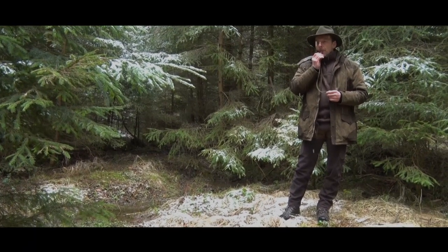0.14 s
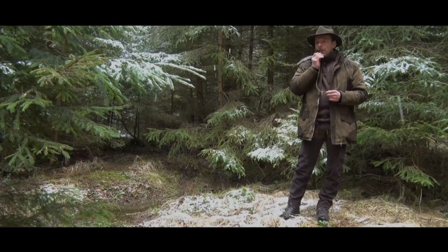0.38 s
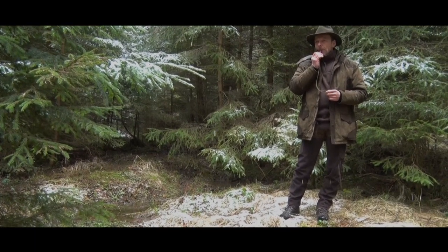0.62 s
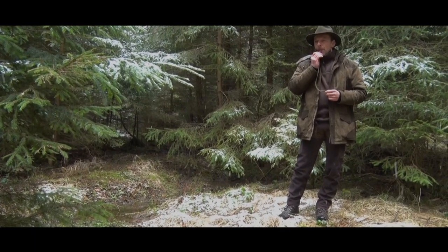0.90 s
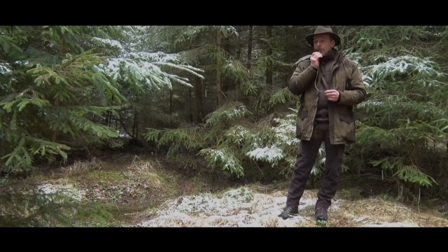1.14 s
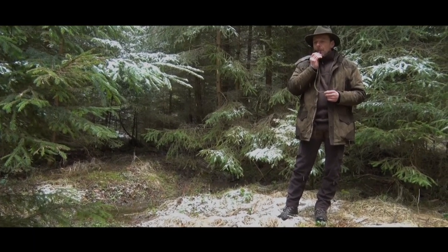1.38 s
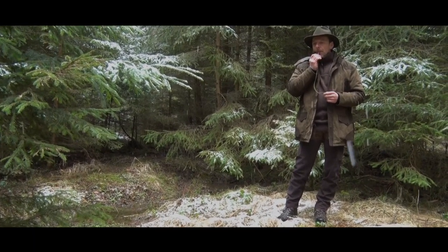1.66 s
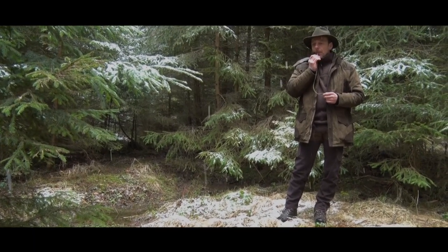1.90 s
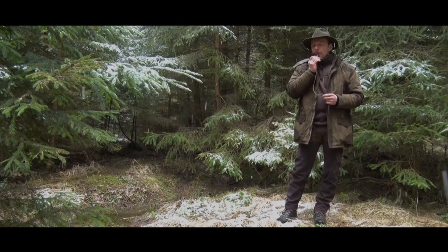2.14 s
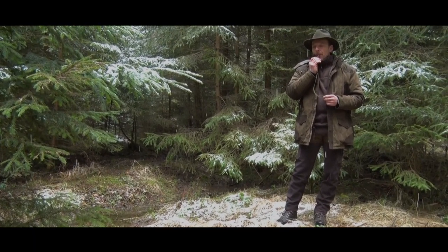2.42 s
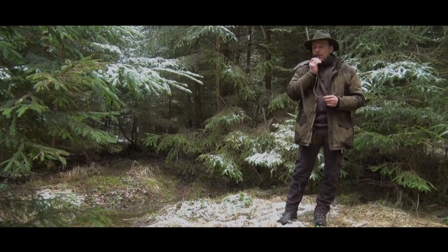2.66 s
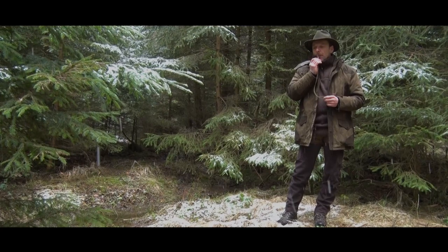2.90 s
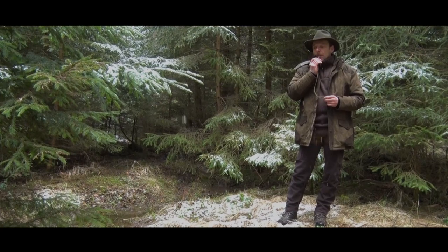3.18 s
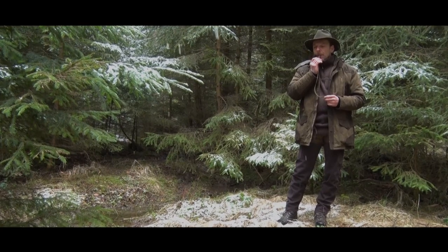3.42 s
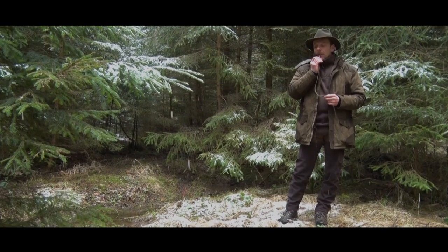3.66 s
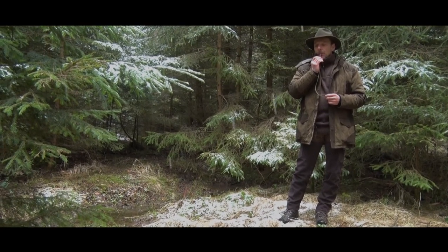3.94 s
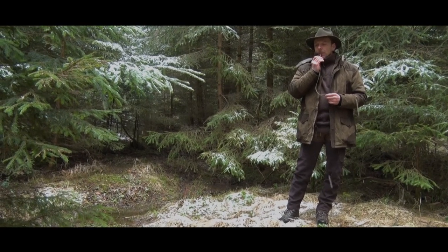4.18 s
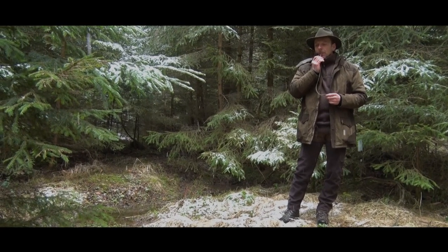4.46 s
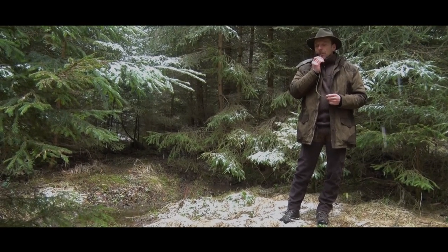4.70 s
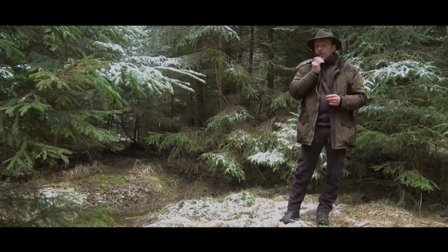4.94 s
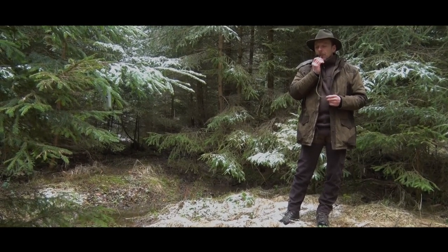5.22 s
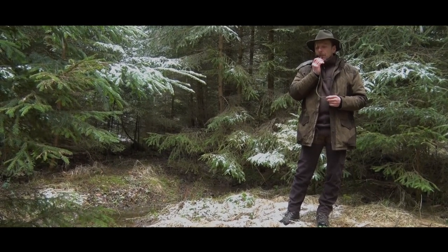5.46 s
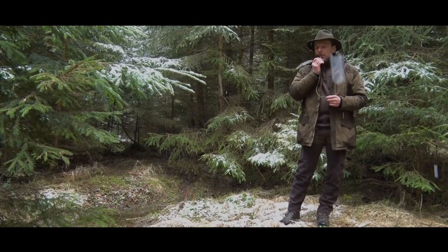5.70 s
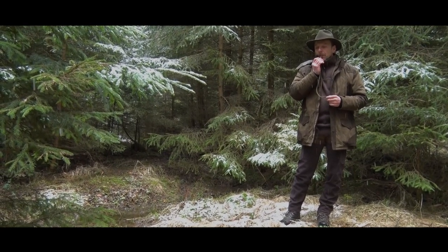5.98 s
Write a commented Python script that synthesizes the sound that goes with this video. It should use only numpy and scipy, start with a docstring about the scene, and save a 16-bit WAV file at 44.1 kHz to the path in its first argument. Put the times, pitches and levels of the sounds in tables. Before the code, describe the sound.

Irregular bursts of tiny, very high, breathy squeaks from a small blown whistle call, mouse-like, in a quiet snowy forest with faint drips.

```python
"""A small antler whistle, blown in short puffs a few metres from the microphone in a quiet snowy forest.
The air jet through its holes sings one clean line that jumps between three jet stages as the pressure
changes: near-sines with octave partners. Filtered noise makes the hiss of the jet, sparse echoes the
faint tail from the trunks, short cracks and rings the wet snow and drips. A faint tone sets in late, and
shaped noise gives the distant rumble, the air and the microphone's own hiss."""
import sys
import numpy as np
from scipy import signal
from scipy.fft import rfft, irfft
from scipy.io import wavfile
from scipy.ndimage import uniform_filter1d

SR = 44100
rng = np.random.default_rng(int(sys.argv[2]) if len(sys.argv) > 2 else 0)


def elevation(decibels):
    """Turn decibel levels (scalar or array-like) into linear amplitude ratios."""
    levels = np.asarray(decibels, float)
    return 10 ** (levels / 20)


def dump_mix(stems):
    """Bounce the given channels to the path in sys.argv[1] as a 16-bit WAV at rate SR."""
    frames = np.atleast_2d(stems).T  # one column per channel
    limited = np.clip(frames, -1, 1)  # hard clip at full scale
    pcm = np.round(limited * 32767).astype(np.int16)
    wavfile.write(sys.argv[1], SR, pcm)


N = 268569
TOP_HZ = 15900  # upper band limit


def evened(x):
    """Scales to rms 1."""
    return x / np.sqrt(np.mean(x ** 2) + 1e-20)


def read(points, hz):
    """Reads a spectrum table on a log frequency axis."""
    f, value = np.transpose(points)
    return np.interp(np.log(hz + 1), np.log(f + 1), value)


def add(mix, s, sound):
    """Mixes a sound in at s seconds."""
    part = mix[..., round(s * SR):][..., :sound.shape[-1]]
    part += sound[..., :part.shape[-1]]


def slow(count, hz):
    """Random drift of rms 1 up to hz."""
    return evened(signal.lfilter(*signal.butter(2, hz, fs=SR), rng.standard_normal(count)))


def resonate(x, hz, width_hz):
    """A fixed resonance of gain 1."""
    return signal.lfilter(*signal.iirpeak(hz, hz / width_hz, SR), x)


def faded(t, rise, fall):
    """Soft start and end, in seconds, over the times t."""
    nearest_end = np.minimum((t - t[0]) / rise, (t[-1] - t) / fall)
    return np.sin(np.pi / 2 * np.clip(nearest_end, 0, 1)) ** 2


def rounded(curve, size):
    """Rounds the corners of a curve over size samples and keeps its ends."""
    padded = np.pad(curve, size, "reflect", reflect_type="odd")
    return uniform_filter1d(padded, size)[size:-size]


def forest():
    """Distant rumble and air, with the microphone's own hiss on top: stereo noise, faintly patchy."""
    # background spectrum before levelling: (frequency [Hz], relative density [dB per Hz])
    floor = [(12, -46.5), (20, -6), (81, -2.5), (210, -14.5), (270, -15), (377, -14), (923, -22),
             (1030, -23.5), (4060, -32), (4540, -31), (13900, -42), (16000, -48)]
    # likeness of the left and right noise: (frequency [Hz], correlation [-1 to 1])
    likeness = [(60, 0.99), (240, 1), (950, 0.45), (3770, 0.091), (15000, 0.99)]
    floor_db = -64.5  # rms of the whole background
    frames, hz = N // 256 + 5, np.fft.rfftfreq(1024, 1 / SR)
    a, b, c, d, patches = rng.standard_normal((frames, 513, 5)).T
    patches = evened(uniform_filter1d(uniform_filter1d(patches, 14, 0), 12, 1))
    same = np.clip(read(likeness, hz), -1, 1)[:, None]
    left = a + 1j * b
    right = same * left + np.sqrt(1 - same ** 2) * (c + 1j * d)
    patch_db = 1.8 * np.clip(hz / 900, 0, 1)[:, None] * patches  # the lowest rumble stays even
    z = np.array([left, right]) * elevation(read(floor, hz)[:, None] + patch_db)
    noise = signal.istft(z, nperseg=1024, noverlap=768)[1][:, :N]
    return elevation(floor_db) * evened(noise)


def hum():
    """A soft sine that sets in and then wavers a little in level."""
    # faint tone: (onset [s], level before a 4 dB lift [dB], frequency [Hz])
    tone = [(5.77, -73, 441)]
    (s, db, hz), = tone
    t = np.arange(N) / SR
    level = elevation(db + 4.0 + 2.0 * slow(N, 10))
    return level * np.clip((t - s) / 0.019, 0, 1) * np.sin(2 * np.pi * hz * t)


def ticks():
    """Snow and drips landing nearby: each a short noise crack and a decaying ring; faint ones at random."""
    # landings: (time [s], ring level before panning [dB], ring frequency [Hz], fall by 60 dB [s])
    landings = [(0.189, -53, 980, 0.038), (0.406, -56, 2700, 0.038), (1.973, -61, 2420, 0.015),
                (2.011, -51, 3350, .015), (2.089, -56, 1290, .025), (2.969, -53.5, 874, 0.027),
                (3.286, -38.5, 1454, 0.064), (3.324, -40.5, 1225, 0.011), (3.404, -46, 640, 0.032),
                (3.439, -51, 3530, .015), (3.459, -43.5, 866, 0.0098), (3.751, -47, 800, 0.017),
                (3.833, -61.5, 1350, 0.12), (3.922, -58, 763, 0.063), (3.952, -55.5, 723, 0.063),
                (4.027, -62.5, 1880, 0.024), (4.145, -57.5, 1350, 0.024), (4.238, -56.5, 3680, 0.014),
                (5.644, -49.5, 1878, 0.0076)]
    # a clump of snow on something hollow: (time [s], peak level [dB], frequency [Hz], fall by 60 dB [s])
    thump = [(3.326, -42, 102, .22)]
    out, t = np.zeros((2, N)), np.arange(SR // 4) / SR
    # 40 faint landings, same columns
    faint = rng.random((40, 4)) * [N / SR, 8, 2500, .015] + [0, -70, 700, .015]
    for s, db, hz, t60 in list(landings) + list(faint):
        pan_db = 2.3 + 2.9 * rng.standard_normal()  # mostly left of centre
        dull_noise = signal.lfilter(*signal.butter(3, 3600, fs=SR), rng.standard_normal(len(t)))
        crack = dull_noise * elevation(-60 * t / .025)
        ring = np.sin(2 * np.pi * hz * t) * elevation(-60 * t / t60)
        sides = elevation(db + np.array([[pan_db], [-pan_db]]) / 2)
        add(out, s, sides * (ring + 1.65 * crack))
    for s, db, hz, t60 in thump:
        add(out, s, elevation(db - 60 * t / t60) * np.sin(2 * np.pi * hz * t))
    return out


def trees(x, t60=0.28, gap=0.0016):
    """Sparse echoes from trunks after gap seconds, one in every 20 samples, other for each side."""
    at = np.arange(round(gap * SR), SR // 2, 20)
    taps = np.zeros((2, SR // 2 + 20))
    spots = at + rng.integers(0, 20, (2, len(at)))
    echoes = rng.choice([-1., 1.], spots.shape) * elevation(-60 * at / SR / t60)
    np.put_along_axis(taps, spots, echoes, 1)
    return signal.fftconvolve(x[None], taps / np.linalg.norm(taps[0]), axes=1)[:, :N]


def jet_hiss(lines, calm):
    """Turbulence through the chamber modes; the overblown mode roars while no line holds the jet."""
    # pushes of air: (start [s], length [s], relative peak level [dB], place of the peak [0-1])
    pushes = [(0.113, 0.1, -37.5, 0.62), (0.352, 0.043, -47, 0.03), (0.503, 0.044, -48.5, 0.66),
              (.743, 0.012, -45.5, 0.5), (1.053, 0.13, -50, 0.44), (1.149, 0.098, -45, 0.6),
              (1.325, .11, -40, 0.38), (1.443, 0.12, -42.5, 0.49), (1.619, 0.077, -41, 0.5),
              (1.671, 0.084, -43, .5), (1.733, 0.13, -42, 0.38), (2.102, 0.072, -47, 0.95),
              (2.288, .035, -54, 0.4), (2.348, 0.017, -45, 0.4), (2.421, 0.045, -53, 0),
              (2.507, 0.017, -47, 0.35), (2.592, 0.013, -48, 0.45), (2.911, 0.073, -50, .6),
              (3.27, 0.077, -41, 1), (3.366, 0.13, -40.5, 0.56), (3.52, 0.057, -57, 0.1),
              (3.595, 0.091, -45.5, 0.4), (4.203, 0.05, -53.5, .2), (4.283, 0.025, -47, 0.16),
              (4.36, 0.021, -51, 0), (4.671, 0.06, -52, 0.4), (4.873, 0.14, -45, 0.31),
              (5.161, 0.092, -50.5, 0.84), (5.457, 0.14, -41, 0.55), (5.605, 0.16, -46.5, 0.46),
              (5.981, 0.13, -38.5, 0.34)]
    # broad hiss: (frequency [Hz], gain [dB])
    hiss = [(500, -17), (2500, -12.5), (4300, -11.5), (7600, -3), (10500, -5), (12300, -4.5),
            (13500, -14.5)]
    # chamber modes, each resonance passed twice: (frequency [Hz], width of one pass [Hz], mean gain [dB])
    chamber = [(4910, 130, -5), (6100, 1800, -4), (8400, 1600, -3), (11010, 3100, -8.5)]
    # noisy mode heard when no line locks: (frequency [Hz], width of one pass [Hz], mean gain [dB])
    overblown_mode = (9500, 1000, 10)
    start_db, end_db = -10, -10.5  # ends of a push against its peak
    blow = np.zeros(N)
    for start, length, db, place in pushes:
        s = start + length * np.array([0, np.clip(place, .01, .99), 1])
        level_db = db + np.array([start_db * min(2 * place, 1), 0, end_db])
        t = np.arange(s[0] - .004, s[-1] + .012, 1 / SR)
        add(blow, t[0], elevation(np.interp(t, s, level_db)) * faded(t, .004, .012))
    noise = rng.standard_normal(N) * elevation(1.96 * slow(N, 130))  # eddies make the hiss rasp
    wide = irfft(rfft(noise) * elevation(read(hiss, np.fft.rfftfreq(N, 1 / SR))), N)
    modes = np.zeros(N)
    for hz, width_hz, db in chamber:
        modes += elevation(db + 4.1 * slow(N, 50)) * resonate(resonate(noise, hz, width_hz), hz, width_hz)
    # bright hiss around 15 kHz, heard where the push outweighs the lines of the lower two stages
    outweighs = blow ** 2 / (blow ** 2 + elevation(-11) * uniform_filter1d(calm ** 2, 600) + 1e-12)
    bright = outweighs * blow * elevation(36) * resonate(noise, 15000, 3000)
    hz, width_hz, db = overblown_mode
    # near 1 where the push outweighs every line
    free = blow ** 2 / (blow ** 2 + elevation(-6.5) * uniform_filter1d(lines ** 2, 200) + 1e-12)
    roar = free * elevation(db + 1.2 * slow(N, 70)) * resonate(resonate(noise, hz, width_hz), hz, width_hz)
    return elevation(-1.0) * blow * (wide + modes + roar + bright)


def arch(place, rise_bend, fall_bend, count=13):
    """Places 0-1 along an event and heights: 1 at the top, 0 at the ends; a top near an end is that end."""
    x = np.linspace(0, 1, count)
    place = place if .15 < place < .7 else round(place)
    rise = (abs(place - x) / (place + 1e-9)) ** rise_bend
    fall = (abs(x - place) / (1 - place + 1e-9)) ** fall_bend
    return x, 1 - np.where(x < place, rise, fall)


def held_stages():
    """Every held jet stage as (stage 1-3, octave partner dB, rows of s, Hz, dB); pressure bends the pitch."""
    # lowest stage, one pitch arch each:
    # (start [s], length [s], relative level [dB], top pitch [Hz], place of the top [0-1])
    peeps = [(.103, 0.0083, -33.5, 6120, 1), (.214, 0.0043, -30.5, 5840, 0),
             (0.343, 0.012, -33.5, 6100, 0.9), (0.383, 0.011, -30.5, 5850, 0),
             (0.44, 0.023, -34.5, 6170, .48), (0.501, 0.009, -32.5, 6040, 1),
             (.541, 0.0022, -30, 5850, 0.4), (0.582, .026, -34, 6290, 0.59),
             (0.657, 0.035, -31.5, 5866, 0.27), (0.728, 0.039, -35, 6290, 0.37),
             (1.039, 0.0019, -31, 6650, 1), (1.245, 0.0057, -46.5, 5860, 0.6),
             (1.275, 0.019, -32.5, 5670, 0.5), (1.901, 0.0017, -37, 5690, 0),
             (2.192, 0.004, -41.5, 5800, 0.14), (2.234, 0.023, -46.5, 5640, .3),
             (2.261, 0.019, -39.5, 6130, 1), (2.314, 0.0047, -40, 5750, 0), (2.387, 0.0032, -48, 5740, 0.2),
             (2.416, 0.0058, -34.5, 6440, 1), (2.506, 0.0074, -46.5, 6230, 0.8),
             (2.533, 0.003, -33.5, 5830, 0), (2.575, 0.0367, -36, 6320, 0.52),
             (2.899, 0.0082, -34.5, 6330, 0.95), (3.077, 0.023, -34, 6060, 0.6),
             (3.354, .004, -35.5, 5710, 0), (3.362, 0.016, -37, 6190, 1), (3.52, 0.0083, -47.5, 6340, 0.7),
             (3.565, 0.0044, -34, 5750, 0), (3.688, 0.0039, -46, 5940, 0.05),
             (4.091, 0.025, -32.5, 5846, 0.23), (4.204, 0.011, -34, 6250, 0.95),
             (4.238, 0.0022, -37.5, 5960, 0.14), (4.279, .006, -43, 6560, 0.65),
             (4.315, 0.0036, -33, 5730, 0), (4.353, 0.0068, -33, 6460, 0.9),
             (4.388, 0.0035, -43, 5870, 0.08), (4.655, 0.027, -35, 6190, 0.93),
             (4.722, 0.0079, -37, 5940, 0), (4.774, 0.0023, -37, 5680, 0.3),
             (5.008, 0.0038, -41, 5930, 0.34), (5.065, 0.0049, -39, 5430, 0.2),
             (5.124, 0.024, -35, 6210, 1), (5.342, 0.0062, -40.5, 5860, 0.24),
             (5.458, 0.0037, -33.5, 6540, 1), (5.76, 0.0024, -46.5, 5940, 0.1),
             (5.796, 0.0047, -31.5, 5870, 0)]
    # middle stage, one arch from and to its edge, same columns as the peeps
    sweeps = [(0.186, 0.024, -27, 11260, 0), (0.358, 0.019, -34, 8825, 0), (0.511, 0.025, -29.5, 8900, 0.6),
              (1.325, 0.032, -35.5, 12570, 1), (1.545, 0.021, -45.5, 11700, 0),
              (1.621, 0.02, -31.5, 12500, 1), (1.841, 0.029, -40, 11960, 0),
              (2.284, 0.026, -36.5, 9290, .4), (2.353, 0.024, -27.5, 10730, 0.36),
              (2.422, 0.052, -34.5, 10600, 0.41), (2.513, 0.014, -30.5, 9130, 0),
              (2.911, 0.08, -35, 10670, 0.47), (3.379, 0.04, -35, 13700, 1), (3.48, 0.015, -36.5, 11330, 0),
              (3.527, .033, -26.5, 8640, 0.35), (4.22, 0.015, -41.5, 8930, 0.05),
              (4.285, 0.025, -28.5, 9000, 0.47), (4.36, 0.028, -31.5, 9050, 0.23),
              (4.687, 0.029, -32.5, 9006, 0.47), (5.466, 0.028, -32.5, 13000, 0.95),
              (5.982, .014, -30, 12700, 0.7)]
    # middle stage, long wandering blows, a list each: (time [s], pitch [Hz], relative level [dB])
    wails = [
        [(.115, 8980, -28), (.132, 10120, -22), (.142, 10300, -34), (.146, 11850, -40), (.158, 11850, -31),
         (.167, 12700, -49)],
        [(1.042, 8500, -39.5), (1.055, 10180, -30.5), (1.072, 9800, -38.5), (1.1, 10200, -36),
         (1.14, 10370, -34), (1.153, 11000, -45.5), (1.166, 11920, -37), (1.18, 12030, -27),
         (1.202, 12250, -35), (1.224, 11380, -34.5), (1.234, 9670, -31.5), (1.243, 8700, -36)],
        [(2.098, 8800, -36.5), (2.106, 10240, -36.5), (2.116, 11030, -34.5), (2.14, 11040, -36.5),
         (2.16, 11140, -33), (2.186, 8670, -37.5)],
        [(3.271, 8500, -37), (3.276, 10200, -33), (3.288, 11770, -39.5), (3.3, 12350, -29.5),
         (3.314, 12260, -32), (3.327, 11600, -31.5), (3.341, 9400, -33), (3.352, 8270, -34)],
        [(3.6, 9250, -45), (3.606, 10470, -37.5), (3.612, 11360, -33.5), (3.622, 12040, -35),
         (3.648, 12460, -36.5), (3.657, 11200, -34), (3.664, 11040, -31), (3.676, 9080, -36.5),
         (3.686, 8140, -34.5)],
        [(4.873, 8960, -34.5), (4.879, 10100, -36), (4.897, 11370, -30.5), (4.91, 11420, -35.5),
         (4.916, 11950, -32), (4.951, 12180, -31), (4.968, 11030, -30.5), (4.985, 9960, -35.5),
         (5.006, 8220, -32.5)],
        [(5.152, 8360, -28), (5.17, 8920, -32.5), (5.194, 9950, -35.5), (5.221, 10160, -34), (5.257, 8900, -33),
         (5.28, 8300, -31), (5.301, 9110, -35.5), (5.321, 8970, -32), (5.339, 8220, -33)],
        [(5.575, 11800, -39.5), (5.581, 10600, -30), (5.594, 9860, -40), (5.614, 10750, -29),
         (5.635, 10800, -31.5), (5.648, 11650, -31), (5.673, 11570, -31.5), (5.73, 10610, -32),
         (5.757, 8110, -37.5)],
    ]
    # top stage, hardest blowing, a list each: (time [s], pitch [Hz], mean level [dB])
    screams = [
        [(.169, 9170, -17.5), (.186, 8900, -24.5)],
        [(1.356, 9500, -16.5), (1.375, 9600, -25.5), (1.385, 9550, -23.5), (1.396, 9960, -23),
         (1.412, 9600, -19.5), (1.43, 9030, -26), (1.446, 9200, -27), (1.452, 9480, -21.5), (1.478, 9600, -24),
         (1.486, 10100, -27), (1.498, 10060, -33.5)],
        [(1.525, 10000, -24), (1.53, 9380, -26.5), (1.545, 8530, -29)],
        [(1.644, 9130, -25), (1.654, 10120, -24.5), (1.664, 10170, -21.5)],
        [(1.743, 9560, -21), (1.752, 9740, -28.5), (1.762, 10240, -23)],
        [(1.822, 9670, -28.5), (1.843, 8570, -22)],
        [(3.423, 9360, -20), (3.465, 9280, -24.5), (3.476, 8500, -25.5)],
        [(5.495, 9620, -26.5), (5.519, 9960, -22), (5.537, 9960, -21.5), (5.55, 9300, -29), (5.562, 8950, -20),
         (5.574, 8400, -32)],
        [(5.997, 9760, -21), (6.006, 10260, -26)],
    ]
    # undertone of high middle-stage blows over the series: (time [s], relative level [dB])
    high_under = [(.1, 12), (1.05, 8.5), (1.35, 6.5), (1.7, 1), (2.1, 6), (2.35, 9.5), (2.45, 4),
                  (2.95, 6.5), (3.3, 1), (3.65, -1.5), (4.9, -1), (5.2, -2), (5.6, -4.5), (6, 2)]
    peep_sag, peep_bend, peep_octave_db = .065, 1.7, -25  # sag: share of pitch lost at the far end
    low_blow_hz, low_sag, low_under_db = 9500, 0.045, 11  # blows that stay low keep a firm undertone
    edge_hz, rise_bend, fall_bend = 8500, 2, 1.3
    climb_bend = 1.67  # a climb into the top stage is straighter
    scream_under_db = -33
    held, middle = [], [np.transpose(rows) for rows in wails]
    for s, length, db, top_hz, place in peeps:
        x, high = arch(place, peep_bend, peep_bend)
        hz = top_hz * (1 - peep_sag * (1 - high))
        held.append((1, peep_octave_db, np.transpose([s + length * x, hz, db + 0 * x])))
    for s, length, db, top_hz, place in sweeps:
        x, high = arch(place, climb_bend if place >= .7 else rise_bend, fall_bend)
        end_hz = edge_hz if top_hz > low_blow_hz else (1 - low_sag) * top_hz
        middle.append((s + length * x, end_hz + (top_hz - end_hz) * high, db + 0 * x))
    for s, hz, db in middle:
        stays_low = hz.max() < low_blow_hz
        under_db = low_under_db if stays_low else np.interp(s[0], *np.transpose(high_under))
        held.append((2, under_db, np.transpose([s, hz, db])))
    return held + [(3, scream_under_db, rows) for rows in screams]


def squeak(stage, partner_db, rows, wobble, flutter, rasp):
    """One jet stage: a near-sine and octave partner, upper ones with a weak third line; the jet wavers."""
    # the lower two stages are louder at some pitches and fainter at others: (pitch [Hz], gain [dB])
    speaks = [(4900, -14.5), (5300, -11), (5650, -5.5), (5900, 1.5), (6150, 2.5), (6300, -6), (6480, -8.5),
              (8100, 1.5), (8500, -17), (8900, 0.5), (9300, -7), (9700, -8), (10000, -5), (10250, -3.5),
              (10550, -10.5), (10800, -4.5), (11050, -5), (11350, 6.5), (11750, 3.5), (12200, 0),
              (12800, 10), (13700, 2.5)]
    # the line an octave below is stronger at some pitches: (frequency of that line [Hz], gain [dB])
    undertone = [(4100, -43), (4550, -24), (5100, -29.5), (5700, -4), (6200, -12), (6600, -28.5)]
    # blows that pass the first pitch keep their undertone above the second, near the lowest chamber mode
    strong_blow_hz, held_under_hz = 10700, 4720
    s, hz, level_db = np.transpose(rows)
    upper = stage > 1
    dying = not upper and hz[-1] < hz[-2]  # the lowest stage sags in pitch as the air runs out
    rise, fall = .0024, .006 if dying else .0024
    t = np.arange(s[0] - rise, s[-1] + fall, 1 / SR)
    hz = rounded(np.interp(t, s, hz), size=min(len(t) // 4, 170))
    speaks_db = read(speaks, hz) * (stage < 3)
    hz = hz * (1 - dying * 0.16 * np.clip((t - s[-1]) / fall, 0, 1) ** 1.27)
    at = slice(round(t[0] * SR), round(t[0] * SR) + len(t))
    phase = 2 * np.pi * np.cumsum(hz * (1 + 0.0049 * wobble[at])) / SR
    main_line = elevation(speaks_db) * np.sin(phase)
    if upper:
        # a weak undertone locks only in part and breaks up
        lock = np.clip(.5 + partner_db / 40, .45, .8)
        under_hz = np.maximum(hz / 2, held_under_hz * (hz.max() > strong_blow_hz))
        under_phase = 2 * np.pi * np.cumsum(under_hz * (1 + .006 * wobble[at])) / SR
        under = (lock + (1 - lock) * rasp[at]) * np.sin(under_phase)
        undertone_db = read(undertone, np.fft.rfftfreq(len(t), 1 / SR))
        under = irfft(rfft(under) * elevation(partner_db + undertone_db), len(t))
        third = elevation(-43 + .6 * min(partner_db, 4)) * (3 * hz / 2 < TOP_HZ)
        lines = main_line + under + third * np.sin(3 * phase / 2)
    else:
        lines = main_line + elevation(partner_db) * np.sin(2 * phase)
    level = elevation(np.interp(t, s, level_db) + flutter[at]) * faded(t, 2 * rise, fall + rise)
    return t[0], np.sqrt(2) * level * lines


def scene():
    """Whistle slightly left, more so around 7.5 kHz; its echo, the falling snow, the tone and the forest."""
    calm, overblown = np.zeros((2, N))
    chance = [slow(N + SR, hz) for hz in (400, 120, 190)]  # wobble, flutter, rasp
    for stage, partner_db, rows in held_stages():
        add(overblown if stage == 3 else calm, *squeak(stage, partner_db, rows, *chance))
    lines = calm + overblown
    whistle = lines + jet_hiss(lines, calm)
    side = 0.055 * whistle + 0.14 * resonate(whistle, 7500, 2500)
    direct = np.array([whistle + side, whistle - side])
    return direct + elevation(-31.5) * trees(whistle) + ticks() + hum() + forest()


def top_cut(x):
    """Nothing passes above the cut-off."""
    return signal.sosfilt(signal.butter(12, 17000, fs=SR, output="sos"), x)


def record(dry):
    """Limits the band at TOP_HZ with a steep linear-phase low-pass."""
    edge = signal.firwin(255, TOP_HZ, window=("kaiser", 8), fs=SR)
    mix = signal.oaconvolve(dry, edge[None], "same")
    return top_cut(mix)


dry = scene()
out = record(dry)
dump_mix(out)
```